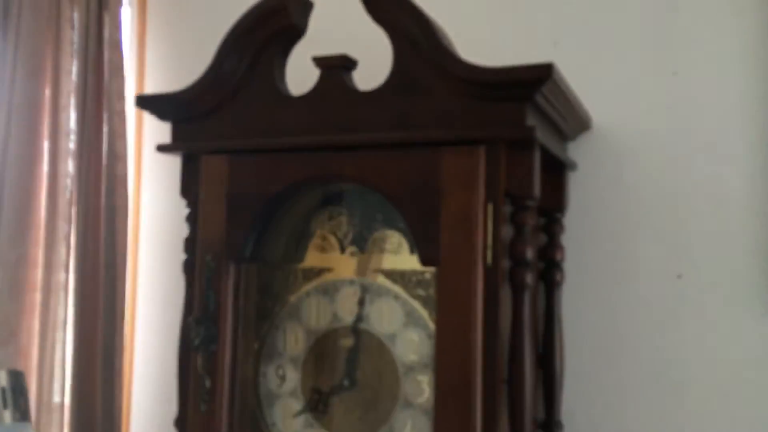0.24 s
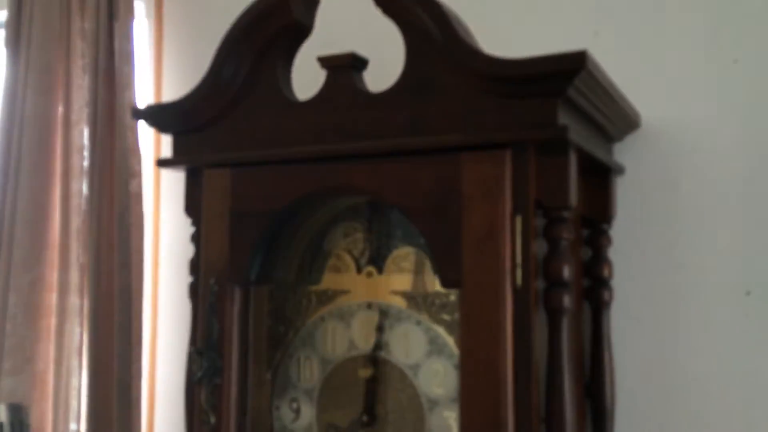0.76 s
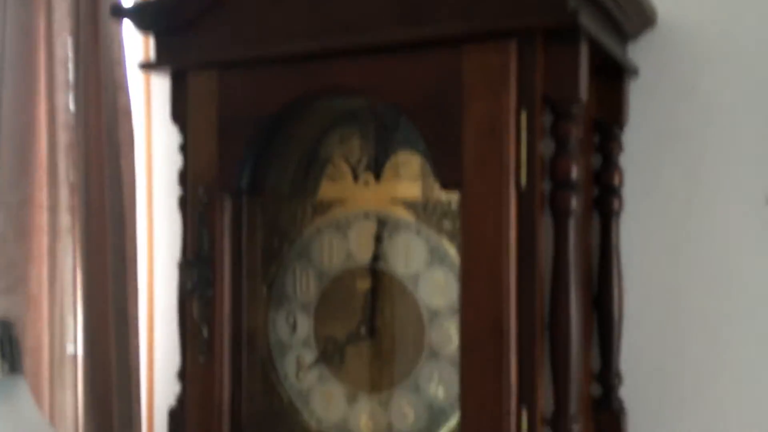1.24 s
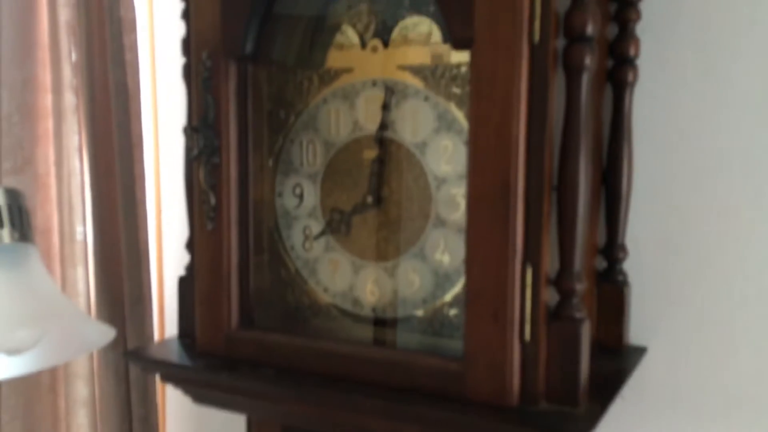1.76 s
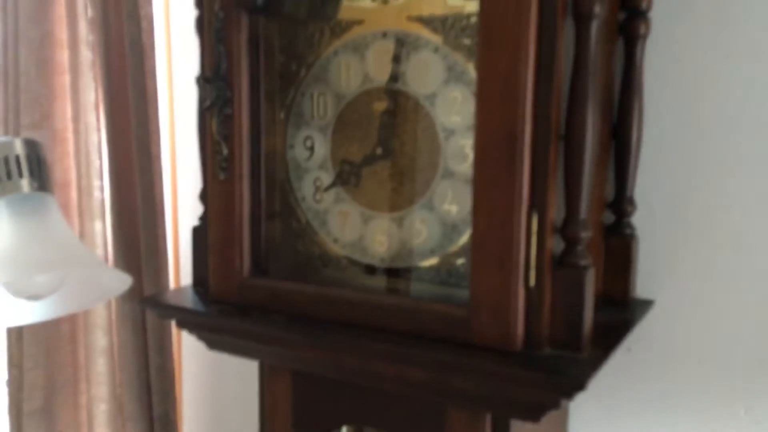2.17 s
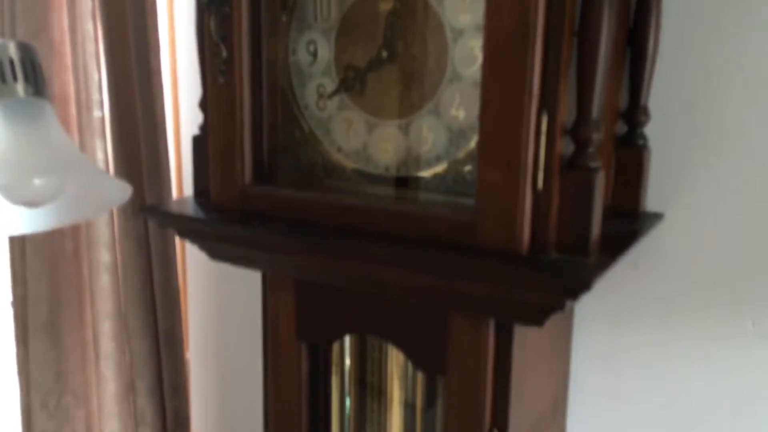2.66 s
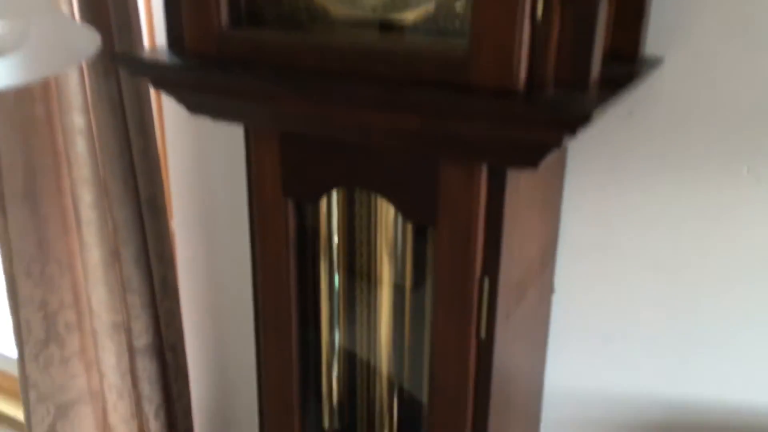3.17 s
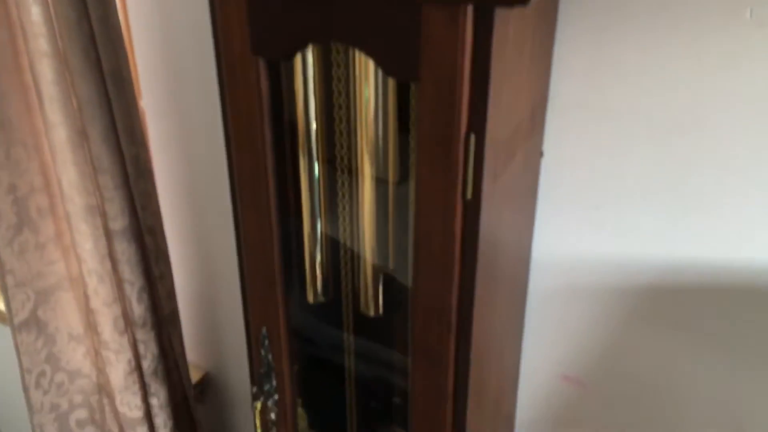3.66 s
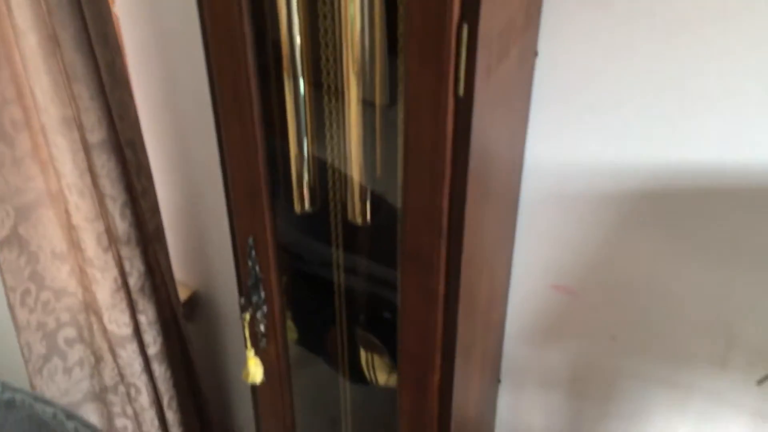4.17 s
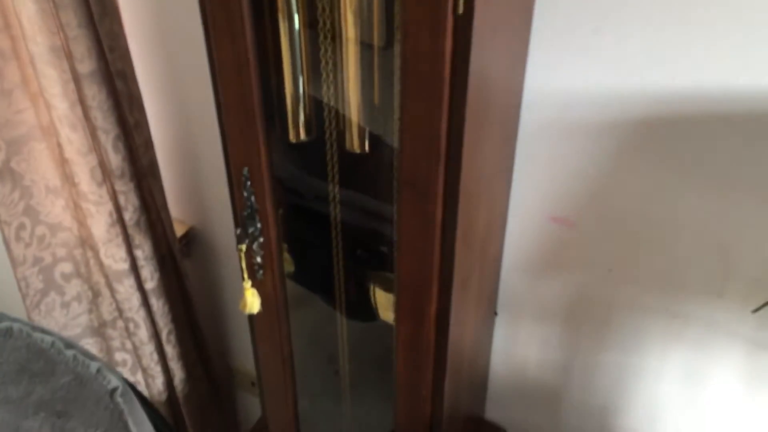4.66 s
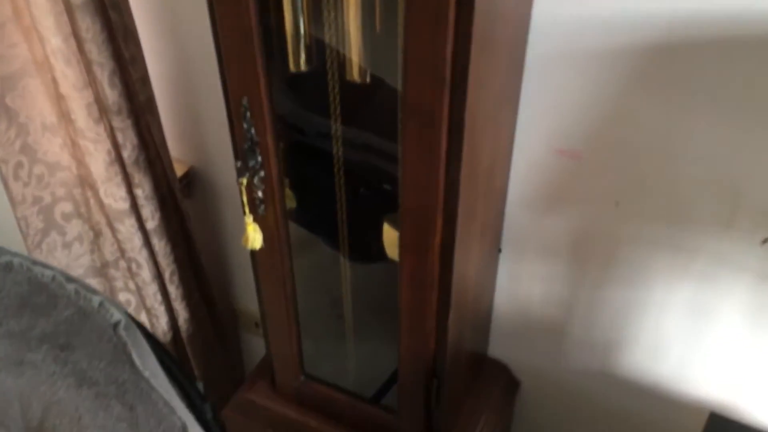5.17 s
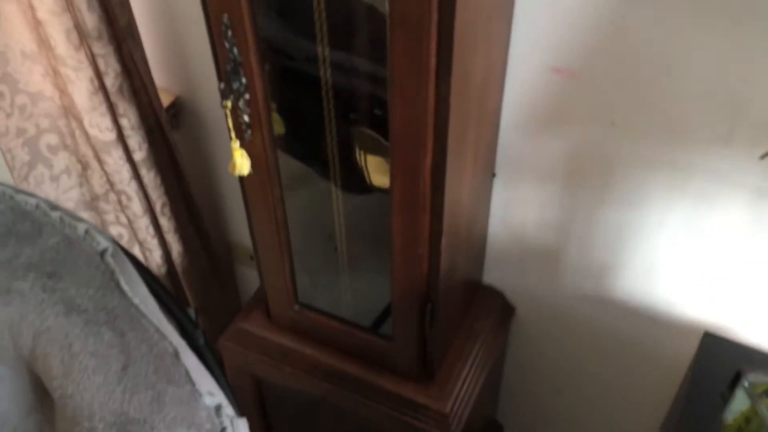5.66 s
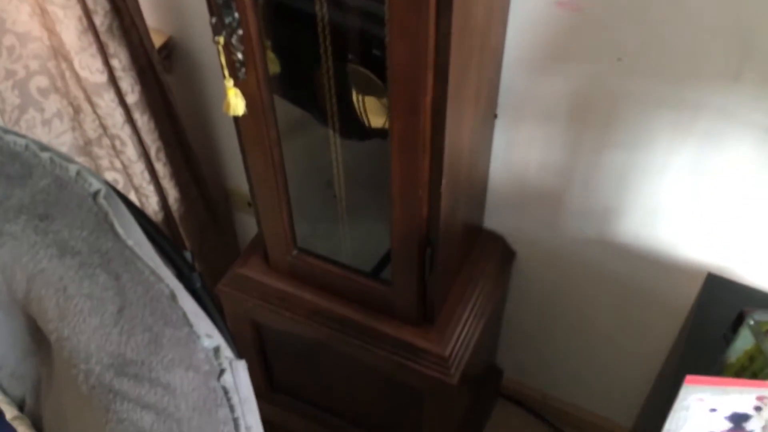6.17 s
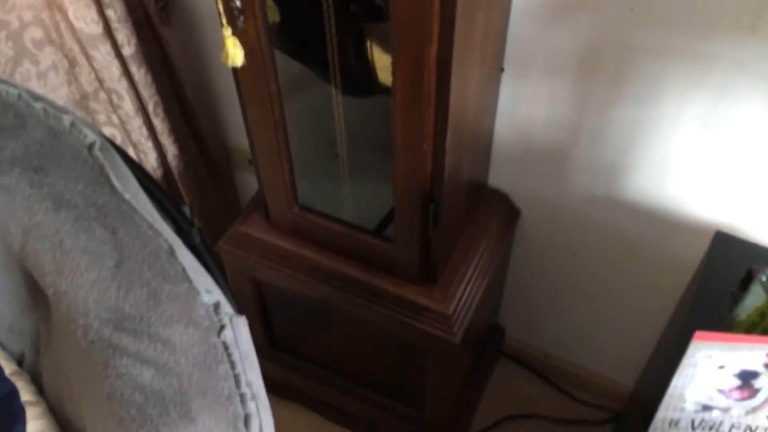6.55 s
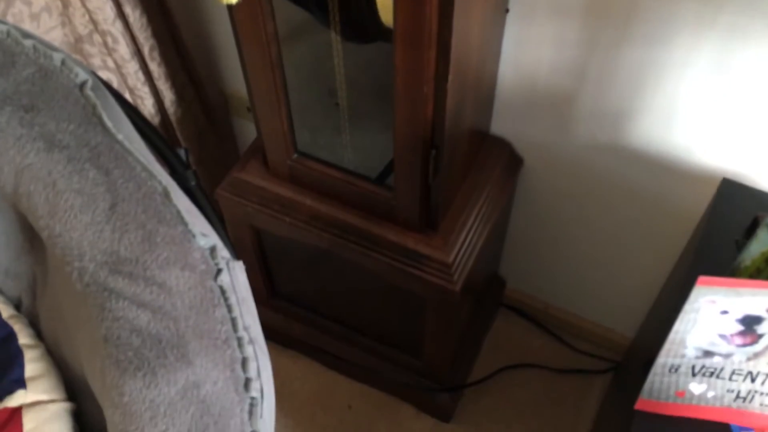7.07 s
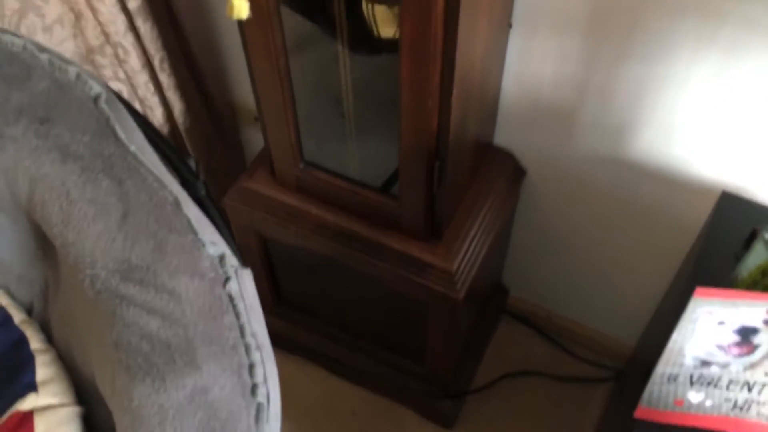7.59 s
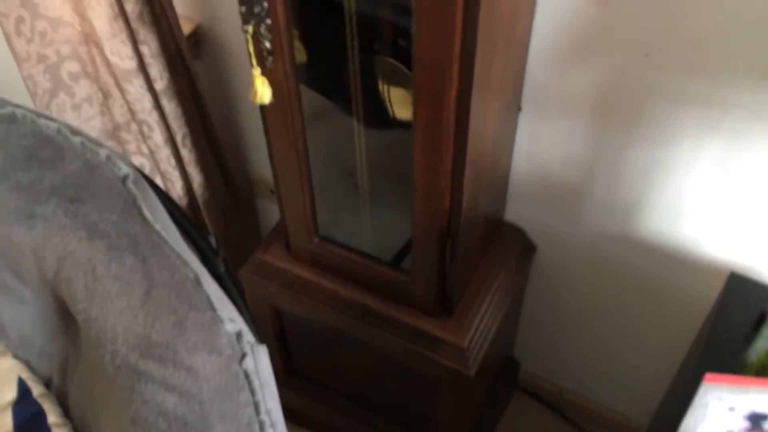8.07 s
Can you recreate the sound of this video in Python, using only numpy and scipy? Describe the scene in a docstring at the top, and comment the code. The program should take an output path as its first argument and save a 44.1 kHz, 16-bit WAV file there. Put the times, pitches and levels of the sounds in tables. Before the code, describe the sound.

Handheld close microphone indoors: soft low room hush and faint hiss throughout. A pendulum clock gives small crisp snaps with a short wooden and metallic rattle, alternating shorter and longer gaps. Handling noise bursts in early, with deep thuds, muffled rubbing and dry scuffs, far louder than the ticks. A calm middle leaves only ticking and a distant clock's dull steps, then a few knocks and thumps close the scene.

```python
"""A low hush and microphone hiss, both filtered noise, run throughout a quiet room.
A longcase clock ticks out of beat: noise snaps, ringing case modes and a clatter of scattered clicks.
Then the hand on the microphone shifts its grip in bursts: shaped noise scuffs, rumbles and rubs, and
filtered pulses make close, dull knocks. Amid this a second clock takes four faint steps of soft noise."""
import sys
import numpy as np
from scipy.fft import rfft, irfft, next_fast_len
from scipy.io import wavfile
from scipy.ndimage import map_coordinates

SR = 44100
rng = np.random.default_rng(int(sys.argv[2]) if len(sys.argv) > 2 else 0)


def transcribe(u):
    """Save the signal u as a 16-bit wav file named by the first command-line argument.

    u: samples, shape (n,) or (channels, n), limited to [-1, 1]; the rate is SR.
    q: integer samples, one column per channel.
    """
    v = np.clip(np.atleast_2d(u).T, -1, 1)
    q = np.round(v * 32767).astype(np.int16)
    wavfile.write(sys.argv[1], SR, q)


N = 367044
TOP_HZ = 15800  # upper band limit


def amp(db):
    """Decibels to gain."""
    return 10 ** (np.asarray(db) / 20)


def unit(x):
    """Scale to rms 1."""
    return x / np.sqrt(np.mean(x ** 2) + 1e-20)


def gain(points, hz):
    """Gain at hz from a curve of (f/Hz, level/dB) points joined on a log frequency axis."""
    f, db = np.transpose(points)
    return amp(np.interp(np.log(hz + 1), np.log(f + 1), db))


def filtered(x, response):
    """Filter x by a function of frequency, with padding against wrap-around."""
    size = next_fast_len(len(x) + SR // 2)
    spectrum = rfft(x, size) * response(np.fft.rfftfreq(size, 1 / SR))
    return irfft(spectrum, size)[:len(x)]


def noise(spectrum, size):
    """Coloured noise of rms 1: white noise shaped by a spectral curve."""
    white = rng.standard_normal(size)
    return unit(filtered(white, lambda hz: gain(spectrum, hz)))


def causal(magnitude):
    """Minimum-phase response of this magnitude, its cepstrum folded so that energy comes early."""
    cepstrum = irfft(np.log(np.maximum(magnitude, 1e-6)))
    half = len(cepstrum) // 2
    cepstrum[1:half] *= 2
    cepstrum[half + 1:] = 0
    return np.exp(rfft(cepstrum))


def fade(t, t60):
    """Exponential decay by 60 dB in t60 seconds."""
    return np.exp(-np.log(1000) * t / t60)


def add(track, s, sound):
    """Mix a sound into the track at s seconds."""
    start = max(round(s * SR), 0)
    part = track[start:][:len(sound)]
    part += sound[:len(part)]


def room(air_db=-58.0, hiss_db=-75):
    """The steady low hush of the house under the microphone's own hiss, as two coloured noises."""
    # colour of the hush: f/Hz, relative level/dB
    air_tone = [(15, -8.5), (28, -3), (53, -1), (72, -8.5), (115, -13), (160, -22.5), (300, -24.5),
                (420, -23), (650, -31), (1100, -31), (2500, -35), (4000, -36), (5200, -54)]
    # colour of the microphone hiss: f/Hz, relative level/dB
    hiss_tone = [(2000, -37.5), (3800, -14.5), (4400, 3), (4900, -2), (5400, 1), (6600, 0), (7600, -3),
                 (8600, -1), (9700, -1), (10400, -8), (11000, -3), (12500, -4), (15500, -10.5)]
    air = amp(air_db) * noise(air_tone, N)
    hiss = amp(hiss_db) * noise(hiss_tone, N)
    return air + hiss


def beats():
    """Two beats to a pendulum swing, yielding time, level, snap level and whether on the exit pallet."""
    # swings timed at the entry pallet: t/s, relative level/dB, relative first-contact snap level/dB
    swings = [(0.3682, -64, 5), (2.162, -61.5, 0), (3.977, -59.5, -6), (5.796, -60, -14),
              (7.615, -61.5, -5)]
    # out of beat: the exit pallet falls well before the half swing, a little louder
    exit_lag_s, exit_db, exit_snap_db = 0.6455, 1.5, 0.5
    for s, db, snap_db in swings:
        yield s, db, snap_db, False
        yield s + exit_lag_s, db + exit_db, snap_db + exit_snap_db, True


def clatter(t, chatter_db, echoes_hz=900, diffuse=.5, hold=0.022, t60=0.24, jitter=.0005):
    """The pallet's bounces, scattered by case and walls: distinct echoes on a diffuse tail."""
    # dense response of the case between its strong modes: f/Hz, relative level/dB
    case_tone = [(300, -24), (700, -2), (1000, 1), (1400, 2), (2300, 6), (2750, -10), (3200, -9),
                 (3700, -11), (5000, -16), (12000, -36)]
    # the pallet lands on the tooth and chatters before it settles: nominal delay/s, relative level/dB
    bounces = [(.001, -3), (.0055, -6), (.0112, -8), (0.0181, -8), (.0245, -4)]
    echoes = (rng.random(len(t)) < echoes_hz / SR) * rng.choice([-1, 1], len(t))
    tail = diffuse * rng.standard_normal(len(t))
    clicks = (unit(echoes) + tail) / np.hypot(1, diffuse)
    clicks *= fade(np.maximum(t - hold, 0), t60)
    for delay, db in bounces:
        add(clicks, delay + jitter * rng.standard_normal(), amp([db + chatter_db]))
    colour = unit(gain(case_tone, np.fft.rfftfreq(len(t), 1 / SR)))
    return irfft(rfft(clicks) * causal(colour))


def longcase(ring_db=5, clatter_db=-5, entry_chatter_db=28, exit_chatter_db=23, snap_t60=0.06,
             build_cycles=8, vary_db=3.5, detune=0.0019):
    """The escape wheel drops on each pallet in turn; each stirs the same modes in its own proportions."""
    # modes of movement and case: nominal f/Hz, mean entry and exit pallet levels/dB (relative), t60/s
    case_modes = [(832, -63, -3, 0.19), (857, -15, -9, 0.27), (977, -24, -13, 0.22), (1250, -4, 3.5, 0.1),
                  (1320, -6, 1, 0.091), (1480, -4, -9, 0.1), (1615, -4, -11, 0.21), (1690, -16, -15, 0.17),
                  (1720, -32, -2, 0.17), (1783, -7, -4.5, 0.2), (2040, -6, -9, 0.13), (2176, -2, -20, 0.13),
                  (2320, -11, -10, 0.17), (2470, -1.5, -10, 0.084), (2650, -12, -18, 0.2),
                  (2820, -21, -18, 0.12), (2965, -45, -11.5, 0.064), (3150, -10, -15, 0.092)]
    # tooth meeting pallet: f/Hz, relative level/dB
    snap_tone = [(500, -29), (1500, 3), (2500, -7), (3150, 13.5), (3700, -17.5), (4400, -4), (5500, -20),
                 (12000, -19)]
    out, t = np.zeros(N), np.arange(SR // 2) / SR
    hz, entry_db, exit_db, t60 = np.transpose(case_modes)[:, :, None]
    swell = 1 - np.exp(-hz * t / build_cycles)  # the low modes of the case take longest to fill
    for s, db, snap_db, on_exit in beats():
        mode_db, chatter_db = (exit_db, exit_chatter_db) if on_exit else (entry_db, entry_chatter_db)
        # each beat varies a little in mode strength and pitch
        strength = amp(mode_db + vary_db * rng.standard_normal(hz.shape))
        mode_hz = hz * (1 + detune * rng.standard_normal(hz.shape))
        phase = 2 * np.pi * (mode_hz * t + rng.random(hz.shape))
        modes = strength * np.sin(phase) * swell * fade(t, t60)
        ring = amp(ring_db) * np.sum(modes, axis=0)
        snap = amp(snap_db) * noise(snap_tone, len(t)) * fade(t, snap_t60)
        rattle = amp(clatter_db) * clatter(t, chatter_db)
        add(out, s, amp(db) * (snap + ring + rattle))
    return out


def stroke(t, attack, hold, t60):
    """Pressure of a finger: it swells from t = 0, is held until t = hold, then dies away."""
    swell = np.sin(np.pi / 2 * np.clip(t / attack, 0, 1)) ** 2
    return swell * fade(np.maximum(t - hold, 0), t60)


def grip(slips_hz=140, grain_db=4):
    """Fingers press and slide on the casing: rumble, a dull rub that catches and slips, and short scuffs."""
    # brief dry scuffs of skin: t/s, level/dB, t60/s
    scuffs = [(1.773, -58, 0.071), (2.104, -54, 0.013), (2.339, -58, .01), (2.709, -57.5, 0.055),
              (3.316, -56.5, .015), (7.505, -57, 0.19), (7.527, -55, 0.031)]
    # colour of the scuffs: f/Hz, relative level/dB
    scuff_tone = [(200, 11), (1000, 2), (3000, 0), (4800, -2.5), (7000, -0.5), (9500, -2), (15000, -7)]
    # fingers press, then let the casing settle: t of the firmest moment/s, level/dB, settling t60/s
    presses = [(1.908, -32.5, 0.27), (2.03, -26.5, 0.41), (2.2, -42.5, 0.98), (2.665, -38, 0.17),
               (2.712, -36, 0.14), (3.35, -41, 0.45)]
    # colour of the pressing: f/Hz, relative level/dB
    rumble_tone = [(15, -5.5), (29, 2.5), (50, -1), (90, -15), (160, -43), (400, -82)]
    # fingers slide over the casing: start t/s, length before the die-away/s, level/dB
    slides = [(2.09, 0.04, -58), (2.25, 0.15, -62), (2.433, 0.15, -56), (2.622, 0.066, -49),
              (3.298, 0.12, -60.5)]
    # colour of the sliding: f/Hz, relative level/dB
    rub_tone = [(50, -22), (130, 13), (300, 3.5), (600, -5), (1200, -13.5), (2200, -32), (6000, -44)]
    press_rise_s = 0.036
    slide_attack_s, slide_t60 = 0.028, 0.15
    time = np.arange(N) / SR
    pressure = sum(amp(db) * stroke(time - s + press_rise_s, press_rise_s, press_rise_s, t60)
                   for s, db, t60 in presses)
    sliding = sum(amp(db) * stroke(time - s, slide_attack_s, length, slide_t60)
                  for s, length, db in slides)
    # smooth random swings of level make the rub catch and slip
    slip_points = rng.standard_normal(int(time[-1] * slips_hz) + 4)
    slips = map_coordinates(slip_points, [time * slips_hz])
    rub = unit(amp(grain_db * slips) * noise(rub_tone, N))
    out = pressure * noise(rumble_tone, N) + sliding * rub
    t = time[:SR // 10]
    for s, db, t60 in scuffs:
        add(out, s, amp(db) * fade(t, t60) * noise(scuff_tone, len(t)))
    return out


def knocks(lag_cycles=0.574, level_db=46, rebound_hz=700):
    """Each knock is a push and a soft rebound; lows arrive later, so it falls from a click into a thump."""
    # knocks of the grip on the casing: t/s, relative strength/dB, hardness/Hz, low cut/Hz, ring/dB
    hits = [(2.105, -19, 746, 50, -7.5), (2.119, -33, 420, 90, -14), (2.177, -24, 950, 42.7, -25),
            (2.3556, -40, 1290, 128, -16), (2.573, -40.5, 350, 60, -18), (2.687, -24.5, 1210, 110, -8),
            (2.6943, -25, 520, 48.7, -20), (2.7153, -29.5, 1380, 45.3, -6), (3.317, -49, 1110, 250, 3.5),
            (3.401, -44, 300, 110, -11), (7.5278, -26.5, 1020, 200, 0), (7.537, -30, 2140, 51, 0),
            (7.5404, -33.5, 646, 160, 1), (8.0709, -19.5, 743, 47, -4.5), (8.087, -31.5, 500, 56.4, -9),
            (8.2052, -22.5, 1280, 40.3, -30), (8.243, -25, 1500, 87, -23)]
    # how the casing passes a knock to the microphone: f/Hz, relative level/dB
    casing_tone = [(20, 3), (55, 7.5), (110, -2), (200, -9), (350, -15.5), (600, -20), (1100, -26),
                   (1900, -30), (2800, -33), (4500, -35), (7000, -39), (15000, -33)]
    # short rings of the casing: f/Hz, width/Hz, relative level/dB
    shell_modes = [(372, 83, -9.5), (1000, 200, -17), (1280, 130, -21.5), (2600, 1000, -19.5)]
    # a looser grip rings more and rebounds more; a harder contact rebounds sooner
    rebound_base_db, rebound_per_ring, rebound_cycles = -4.5, 1, 2.55
    out, hz = np.zeros(N), np.fft.rfftfreq(SR // 2, 1 / SR)
    dispersion = np.exp(-2j * np.pi * lag_cycles * np.log((hz + 10) / TOP_HZ))
    shell = sum(amp(db) * 1j * hz * width / (f * f - hz * hz + 1j * hz * width)
                for f, width, db in shell_modes)
    # the rebound is strongest around rebound_hz
    rebound_tone = 2 * hz * rebound_hz / (hz ** 2 + rebound_hz ** 2)
    for s, db, hard_hz, cut_hz, ring_db in hits:
        contact = 1 / np.sqrt(1 + (hz / hard_hz) ** 4)  # a softer contact loses its highs
        low_cut = 1 / np.sqrt(1 + (cut_hz / (hz + 1)) ** 6)
        # a loose grip lets the shell ring
        body = np.hypot(gain(casing_tone, hz), amp(ring_db) * np.abs(shell))
        rebound_db = rebound_base_db + rebound_per_ring * ring_db
        delay = rebound_cycles / hard_hz
        rebound = amp(rebound_db) * rebound_tone * np.exp(-2j * np.pi * hz * delay)
        knock = irfft(causal(body * contact * low_cut) * dispersion * (1 + rebound))
        add(out, s, amp(db + level_db) * knock[:len(knock) // 2])
    return out


def far_clock(rise=0.0061, t60=0.25):
    """Soft steps that arrive mostly as reverberation: coloured noise with a quick swell and a decay."""
    # steps of the far clock: t/s, relative level/dB
    steps = [(2.394, -61.5), (4.388, -64), (5.385, -70), (6.400, -60)]
    # colour of a step: f/Hz, relative level/dB
    step_tone = [(400, -34), (800, -4), (1300, -9), (1600, 7), (1850, 14), (2250, -14), (3200, -4),
                 (6000, -33)]
    out, t = np.zeros(N), np.arange(SR // 2) / SR
    envelope = (1 - np.exp(-t / rise)) * fade(t, t60)
    for s, db in steps:
        add(out, s, amp(db) * noise(step_tone, len(t)) * envelope)
    return out


def scene():
    """The room, both clocks and the hand summed at one microphone."""
    return (room() + longcase() + grip() + knocks() + far_clock())[None]


def record(dry):
    """Keep nothing at or above the band limit."""
    return np.array([filtered(channel, lambda hz: hz < TOP_HZ) for channel in dry])


dry = scene()
out = record(dry)
transcribe(out)
```